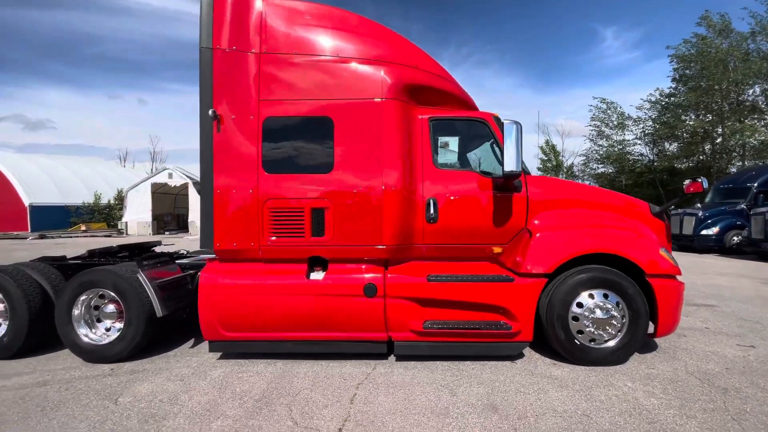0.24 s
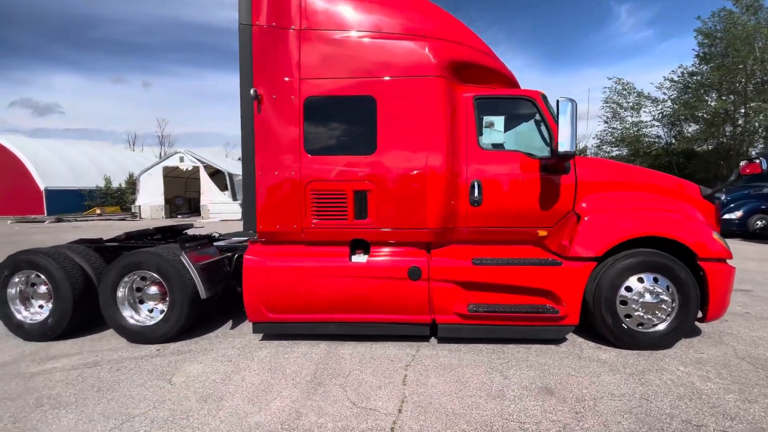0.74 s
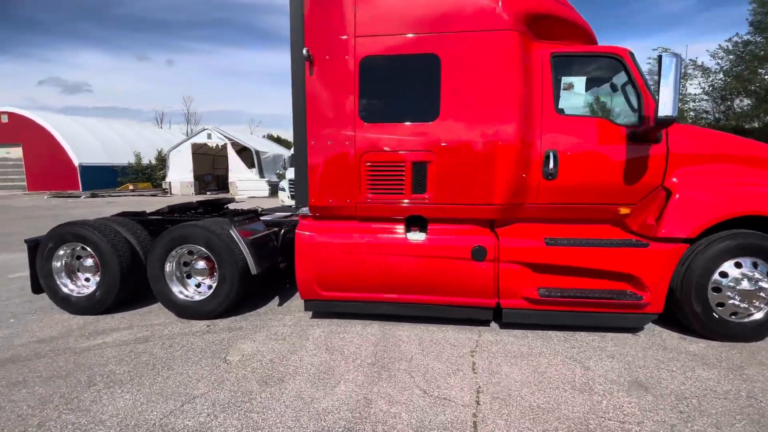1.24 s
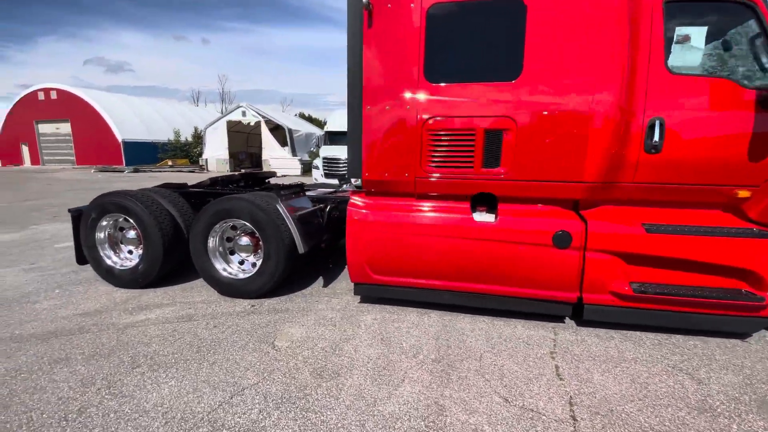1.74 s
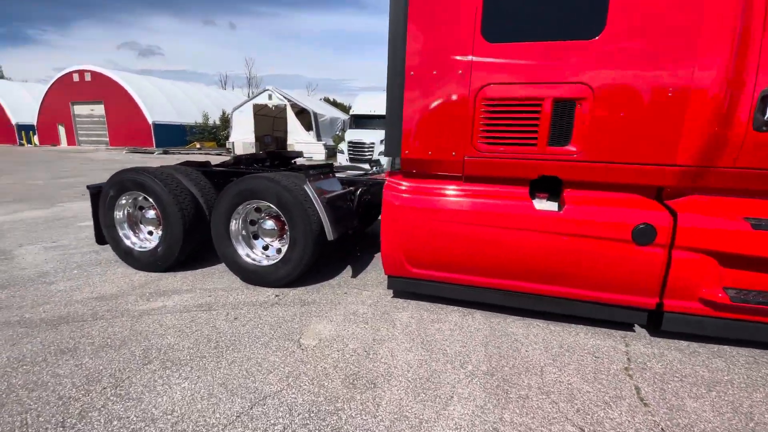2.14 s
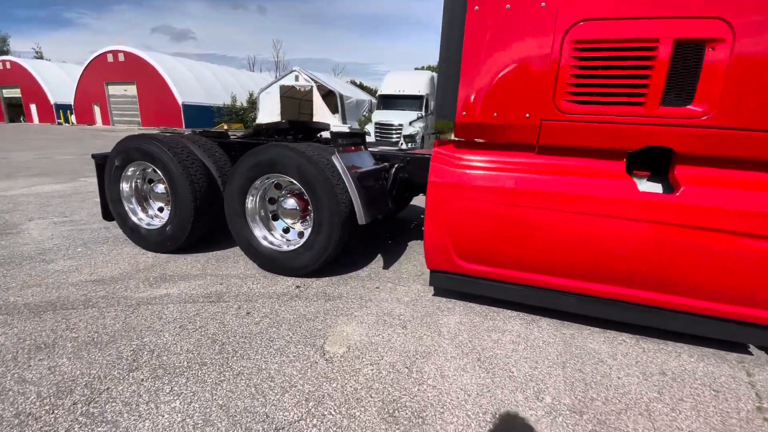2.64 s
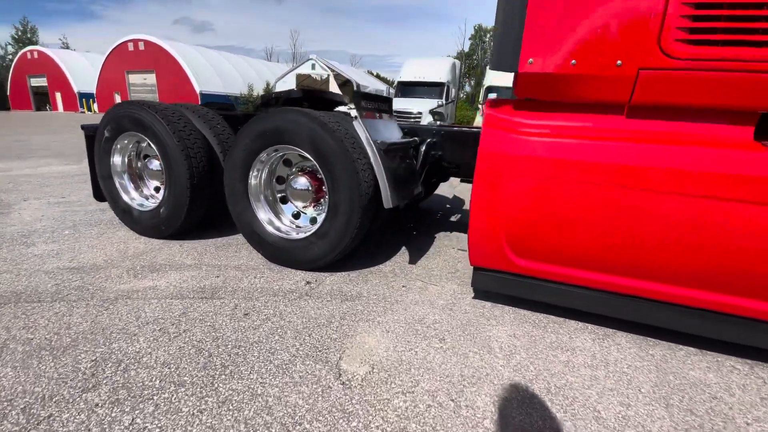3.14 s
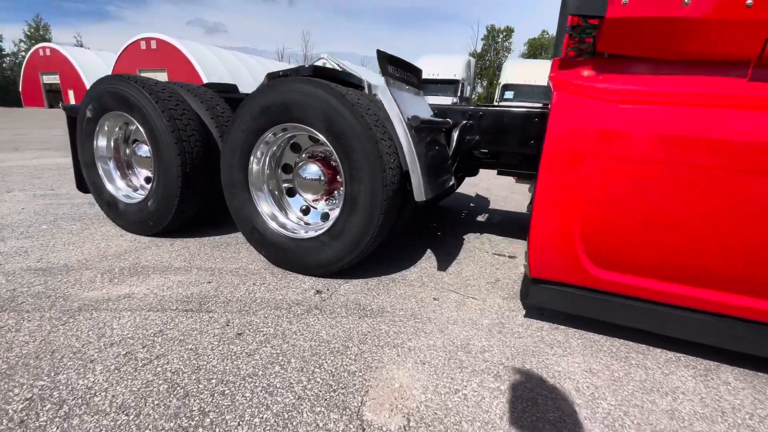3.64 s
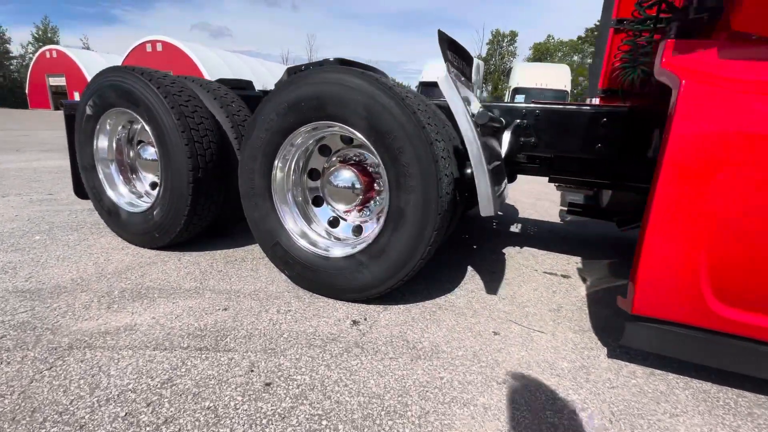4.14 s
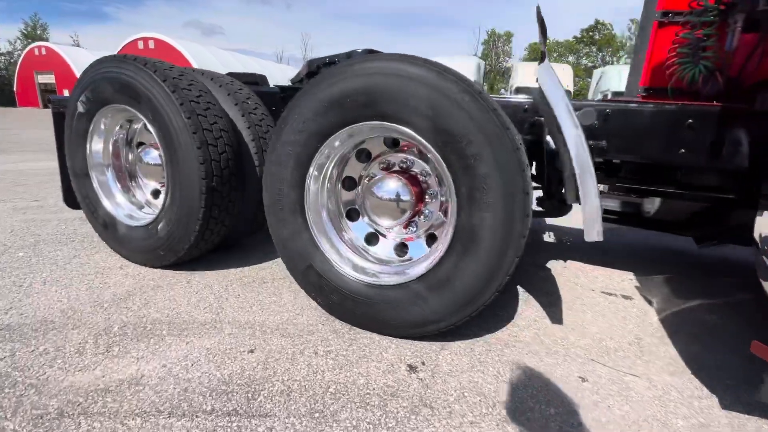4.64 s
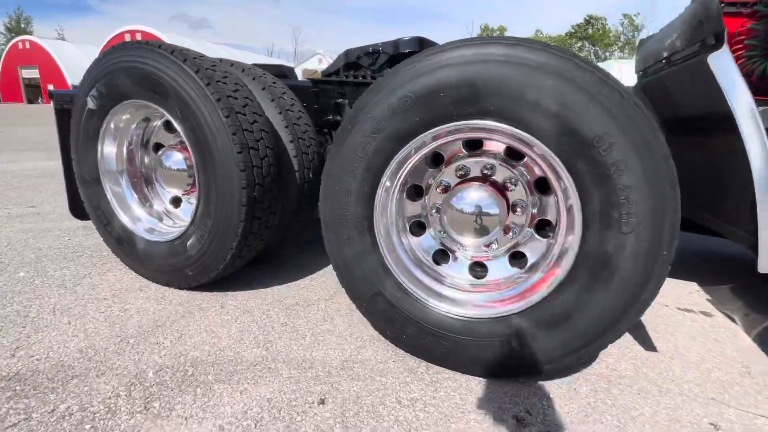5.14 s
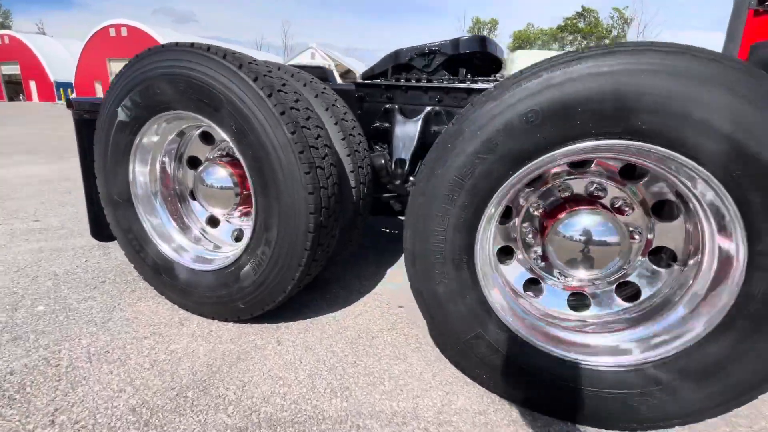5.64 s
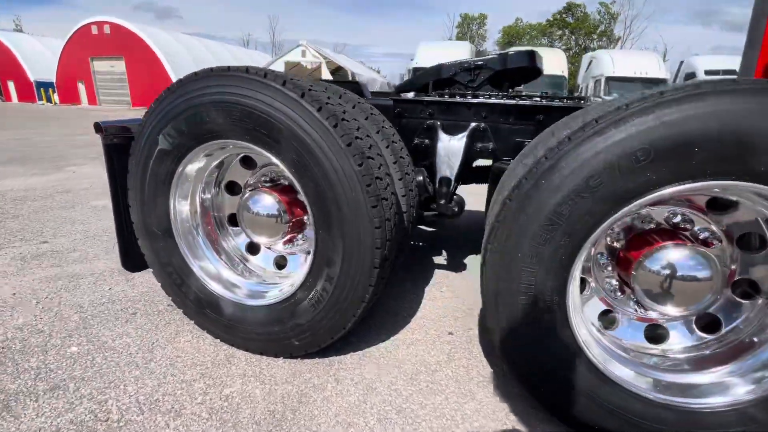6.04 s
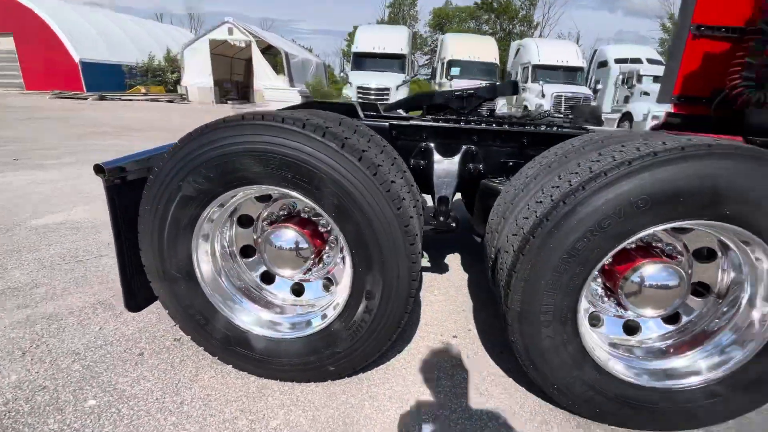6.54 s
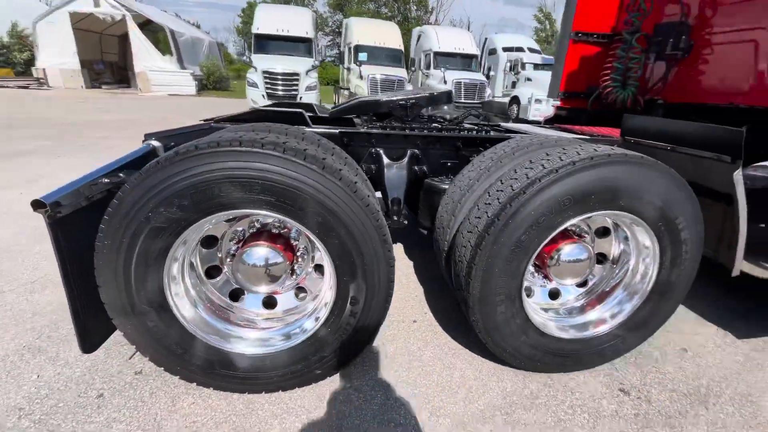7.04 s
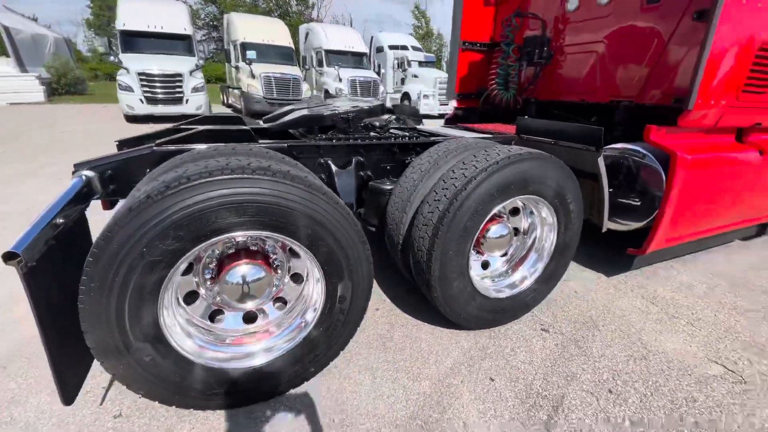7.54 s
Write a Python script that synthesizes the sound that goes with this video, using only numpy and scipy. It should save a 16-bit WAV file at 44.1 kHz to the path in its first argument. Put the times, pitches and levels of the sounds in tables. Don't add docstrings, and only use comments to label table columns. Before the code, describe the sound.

On an open paved lot a large diesel truck idles with low throbbing drone, dense clatter and airy fan hiss. Wind thumps and flutters on a hand-held stereo microphone, mostly on the left. The bass thins early and returns as the walk reaches the rear wheels, where shoes scrape grit. Late on, a sharp spit of compressed air bursts out, the sound briefly ducks, and the idle comes back more distant.

```python
import sys
import numpy as np
from scipy import signal
from scipy.fft import rfft, irfft, next_fast_len
from scipy.io import wavfile
from scipy.ndimage import map_coordinates

SR = 44100
rng = np.random.default_rng(int(sys.argv[2]) if len(sys.argv) > 2 else 0)


def nominal_scale(level):
    x = np.asarray(level, float) / 20
    return 10 ** x


def inscribe(sig):
    pcm = np.round(np.clip(np.atleast_2d(sig).T, -1, 1) * 32767)
    wavfile.write(sys.argv[1], SR, pcm.astype(np.int16))


N = 343523

# (time [s], place [share])
WALK = [
    (0, 0.037),
    (2.0, 0.29),
    (4.4, 1),
    (7.79, 1),
]
# (time [s], distance [m])
DISTANCE = [
    (0, 3.94),
    (1.6, 4.05),
    (3.2, 3.99),
    (5.3, 4.47),
    (6.0, 5.56),
    (7.17, 4.07),
    (7.35, 8.6),
    (7.79, 8.2),
]
# (middle [s], half length [s], gain [dB])
DRONE_GAPS = [
    (3.6, 0.32, 7),
    (5.6, 0.6, 9.6),
]
# (middle [s], half length [s], gain [dB])
CLATTER_GAP = (5.52, 1, 3.4)
# (time [s], change [dB], glide [s])
BASS_CUT = [
    (1.57, -14.5, 0.052),
    (3.9, 10, 0.39),
    (4.38, 3.5, 0.052),
    (7.62, -9, 0.017),
]
# (frequency [Hz], coherence [share])
LIKENESS = [(60, .88), (250, .9), (500, .82), (1000, .8), (2000, .5), (4000, .3), (7500, .65), (8800, .85),
            (9800, .9995), (10500, .9995), (12000, .97)]
# (frequency [Hz], left over right [dB])
LEFT_DB = [(60, -1), (400, -1), (1200, 2.5), (2200, 3.5), (4000, 5), (7000, 10.5), (9000, -1), (9700, 0),
           (13000, 0)]
# (frequency [Hz], left lead [rad])
LEAD = [(0, 0), (100, -.45), (520, -1.5), (1120, -1.7), (1640, -3.5), (3270, 2.4), (4310, -.3), (5430, 3.4),
        (6120, 5.9), (8350, 7.9), (9220, 4.6), (9750, np.pi), (10500, np.pi), (10900, 2.75), (11600, .7),
        (11900, 0), (13300, 0)]
# (frequency [Hz], density [dB])
GUST_SPECTRUM = [(15, -41), (35, -8.5), (70, 8.5), (180, 2), (350, -4), (700, -22.5), (1200, -20.5),
                 (2500, -80)]
# (peak [s], half length [s], left level [dB], left over right [dB])
GUSTS = [(1.181, .12, -12.5, 6.5), (1.424, 0.15, -17.5, 12), (1.675, .1, -14.5, 18), (2.021, .15, -18, 4),
         (2.596, .2, -20.5, 4.5), (2.895, .22, -15.5, 3), (3.399, .25, -16.5, 1), (4.709, 0.25, -25.5, 1),
         (5.197, .5, -23.5, 19), (6.001, .3, -21.5, 1), (6.548, 0.27, -17.5, -1.5), (7.314, .12, -17, 3)]
# (time [s], peak [dB], frequency at the peak [Hz])
PUFFS = [(1.15, -3, 800), (1.159, -2, 526), (1.175, -9, 480), (1.183, -2, 750), (1.187, -6, 400),
         (1.263, -9, 430), (1.284, -3.5, 397), (1.366, -3, 450), (1.367, -9, 1400), (1.468, -5, 467),
         (1.642, -5, 477), (1.658, -1, 760), (1.714, -8, 480), (2.014, 2, 1040), (2.022, -6, 700),
         (2.027, -8, 490), (2.674, -2, 775), (2.686, -11, 1100), (2.749, -6, 680), (2.81, -1, 760),
         (2.818, -7, 490), (2.879, -4, 330), (2.908, -12, 505), (2.922, -5.5, 805), (2.936, -3, 1120),
         (2.956, -2, 1130), (3.161, -9, 420), (3.354, -2.5, 845), (3.547, -2.5, 900), (3.555, -7, 606),
         (3.731, -1.5, 840), (4.447, -10, 800), (4.464, -1.5, 1290), (4.482, -7, 1400), (4.781, -2, 534),
         (5.053, -13, 680), (6.362, -7, 622), (6.454, -4, 513), (7.295, -8, 616), (7.305, -6, 490),
         (7.357, -6.5, 450), (7.358, -11, 1460), (7.529, -13, 890)]
# (time [s], peak [dB], frequency at the peak [Hz])
THUMPS = [(0.86, -6, 302), (0.969, -7, 332), (1.118, -5, 219), (1.165, -5, 260), (1.188, -5, 290),
          (1.267, -8, 252), (1.428, -1, 262), (1.46, -6, 220), (1.559, -2, 258), (1.63, -3, 332),
          (2.033, -8, 213), (2.418, -13, 355), (2.75, -10, 263), (3.803, -9.5, 410), (4.935, -8, 270),
          (6.025, -3, 288), (6.37, -6, 260), (6.459, -9, 270), (7.13, -16, 330), (7.19, -9, 260),
          (7.25, -14, 280), (7.298, -9, 298), (7.339, -11, 220)]
# (frequency [Hz], density [dB])
GRIT = [(400, -22), (800, -2), (1000, 0), (1600, 0), (2100, -6), (3000, -13), (4500, -36)]
# (time [s], rms level [dB], decay [s])
SCUFFS = [
    (2.935, -34, .012),
    (4.443, -28, .005),
    (4.461, -22, .004),
    (4.856, -21, .006),
    (5.092, -25, .03),
    (5.232, -22, .016),
    (5.34, -30, .02),
    (7.545, -31, .014),
]
# (middle [s], half
# length [s], frequency [Hz], bandwidth [Hz], rms level [dB])
RINGS = [(.2, .25, 1800, 150, -50), (.7, .55, 2700, 50, -47), (2.55, .2, 2720, 90, -52),
         (3.115, .045, 1180, 40, -34), (3.65, .1, 1600, 80, -47), (4.5, .04, 1700, 60, -37),
         (.25, .3, 4050, 200, -50), (7.15, .12, 4980, 80, -54), (6.778, .005, 6250, 250, -31),
         (6.8, .02, 6200, 80, -28), (6.83, .04, 7250, 400, -40), (.987, .004, 9500, 2500, -44),
         (7.555, .02, 2450, 200, -43), (7.7, .12, 2850, 250, -54), (5.35, .03, 2900, 150, -46),
         (4.95, .06, 1400, 80, -40), (5.4, .5, 1370, 120, -42), (5.55, .1, 600, 60, -34),
         (5.3, .95, 560, 350, -28), (2.9, 1.3, 700, 250, -36), (.7, .7, 400, 20, -50),
         (6.9, .09, 2700, 150, -46), (6.803, .02, 4250, 200, -29), (6.97, .17, 1300, 300, -43),
         (6.96, .13, 1900, 500, -50), (1.8, .12, 750, 200, -34), (7.12, .08, 280, 80, -36)]
# (time [s], frequency [Hz], peak level [dB])
TURBO = [
    (0, 6172, -60),
    (1.2, 6186, -57),
    (3.1, 6192, -57),
    (4.2, 6136, -54),
    (5.3, 6120, -57),
    (6.7, 6124, -53),
    (6.9, 6120, -62),
    (7.3, 6110, -58),
    (7.79, 6090, -55),
]
# (frequency [Hz], density [dB])
BLAST = [(1200, -32), (1900, -10), (2300, -3), (2650, 3.5), (3400, 0), (4300, 7), (5200, 4.5), (6300, 8),
         (8000, 3.5), (9000, 4.5), (10500, 11), (11200, 11), (12000, 2), (12600, -12), (13000, -36)]
# (frequency [Hz], density [dB])
CLATTER = [(150, -19), (260, -1.5), (400, 0.5), (530, -2.5), (700, -2), (1050, -5), (1450, -3.5),
           (1800, -11), (2300, -17), (3200, -35)]
# (frequency [Hz], density [dB])
HISS = [(1500, 7.5), (2100, -10), (2500, 0), (2680, 2.5), (2900, 1.5), (3400, 1), (4300, 1.5), (5200, 1.5),
        (5700, -4), (7000, -6), (8500, -7.5), (10300, -1), (11000, 1), (11600, -10.5), (12900, -24)]
# (middle [s], half length [s], frequency [Hz],
# half width [octaves], gain [dB])
BAND_SWELLS = [(0.32, 0.63, 5300, 0.36, -3.5), (0.93, 0.58, 670, 0.28, 3.5), (0.065, 0.12, 1600, 0.64, 3),
               (1.7, 1, 515, 0.11, -12), (1.4, 0.45, 1700, 0.39, -2.5), (3.3, 0.98, 342, 0.2, -12.5),
               (4.07, 0.21, 1500, 0.17, -3), (4.63, 0.29, 1530, 0.48, 3), (4.1, 0.8, 4100, 0.43, -2.5),
               (7.1, 0.2, 3500, 0.36, -6), (7.1, 0.22, 750, 0.2, -5), (7.68, .15, 550, 0.29, -7),
               (7.2, 0.11, 1200, 0.31, 3), (7.9, .3, 4600, 0.31, -2)]
# (multiple of the four-stroke cycle [1], rms level at the cab [dB], rms level at the axles [dB])
EXHAUST = [(12, -33, -35), (15, -32, -27), (18, -22.5, -19), (19, -32, -30), (20, -39, -35),
           (21, -18.5, -18), (24, -39, -41), (25, -35, -42), (26, -40, -49), (27, -34, -36), (28, -40, -41),
           (29, -44, -37), (30, -40, -39), (31, -39, -46), (32, -37, -52), (33, -33, -37), (34, -46, -58),
           (35, -33, -36), (36, -34, -46), (37, -39, -47), (38, -43, -54), (39, -35, -43), (41, -52, -51),
           (45, -46, -46), (56, -46, -38), (79, -38, -40)]
# (frequency [Hz], density [dB])
RUMBLE = [(20, -64), (50, 4.5), (90, -9), (190, 11.5), (260, -20.5), (400, -54)]

CYCLE_HZ = 5.0
VALVE_S = 6.783


def in_time(rows):
    s, *columns = np.transpose(rows)
    return [np.interp(np.arange(N) / SR, s, c) for c in columns]


def at_hz(points, hz):
    x, y = np.array(points).T
    return np.interp(np.log(hz + 1e-9), np.log(x), y)


def rms_one(x):
    return x / np.sqrt(np.mean(x ** 2) + 1e-20)


def ramp(s, length):
    return np.clip((np.arange(N) / SR - s) / length, 0, 1)


def hump(s, half):
    return np.exp(-((np.arange(N) / SR - s) / half) ** 2)


def drift(rate, count=1, size=N):
    r = np.exp(-80 * np.pi * rate / SR)
    white = rng.standard_normal((count, N // 40 + 2002))
    slow = signal.lfilter([1], [1, -2 * r, r * r], white)[:, 2000:]
    read_at = np.arange(size) * N / size / 40
    return np.array([np.interp(read_at, np.arange(len(s)), rms_one(s)) for s in slow])


def plain_noise(spectrum):
    size = next_fast_len(N)
    hz = np.arange(size // 2 + 1) * SR / size
    return rfft(rng.standard_normal((2, size))) * nominal_scale(at_hz(spectrum, hz)), hz, size


def noise(spectrum, patchy_db=None, rate=None):
    shaped, hz, size = plain_noise(spectrum)
    if patchy_db is None:
        return rms_one(irfft(shaped, size)[:, :N])
    lowest, highest = spectrum[0][0], spectrum[-1][0]
    edges = lowest * 2 ** np.arange(0, np.log2(highest / lowest) + .5, .5)
    small = min(size, next_fast_len(int(size * 2.5 * edges[-1] / SR)))
    shaped, hz = shaped[:, :small // 2 + 1], hz[:small // 2 + 1]
    flicker = nominal_scale(patchy_db * drift(rate, count=len(edges), size=small))
    patchy = 0
    for lo, hi, gain in zip(edges, edges[1:], flicker):
        patchy = patchy + gain * irfft(shaped * ((hz >= lo) & (hz < hi)), small)
    return rms_one(irfft(rfft(patchy), size)[:, :N])


def recorder_db():
    delay_s, attack_s, depth_db = 0.008, .025, -28.5
    start = VALVE_S + delay_s

    def duck(hold_s, release_s):
        return depth_db * (ramp(start, attack_s) - ramp(start + attack_s + hold_s, release_s))

    cut_db = sum(step_db * ramp(s, glide) for s, step_db, glide in BASS_CUT)
    return cut_db, duck(0.11, 0.27), duck(.16, .3)


def engine_levels(cut_db, duck_db, mid_db):
    near_m = 4.0
    metres, place = in_time(DISTANCE)[0], in_time(WALK)[0]
    loss_db = -20 * np.log10(metres / near_m)
    drone_gap_db = sum(db * hump(s, half) for s, half, db in DRONE_GAPS)
    middle, half, db = CLATTER_GAP
    clatter_gap_db = db * hump(middle, half)
    boom_db = -19 + 0.87 * loss_db + cut_db + duck_db
    drone_db = -14 + 0.8 * loss_db - 7 * place + drone_gap_db
    drone_db = drone_db + 0.58 * cut_db + 0.76 * mid_db
    clatter_db = -29.5 + loss_db + clatter_gap_db + 0.69 * mid_db
    fan_db = -39.0 + loss_db + 0.14 * duck_db
    return boom_db, drone_db, clatter_db, fan_db


def ports(pair):
    size = next_fast_len(N + 4096)
    hz = np.arange(size // 2 + 1) * SR / size
    direct, scattered = rfft(pair, size)
    alike = np.clip(at_hz(LIKENESS, hz), 0, 1)
    turn = np.exp(-1j * np.interp(hz, *np.transpose(LEAD)))
    right = alike * turn * direct + np.sqrt(1 - alike ** 2) * scattered
    tilt = nominal_scale(at_hz(LEFT_DB, hz) / 2)
    return irfft([direct * tilt, right / tilt], size)[:, :N]


def gusts():
    sides = np.array([[0], [-1]])
    power = sum(nominal_scale(left_db + pan_db * sides) ** 2 * hump(s, half) for s, half, left_db, pan_db in GUSTS)
    breeze = nominal_scale(-33.0 + 25.5 * sides)
    return np.sqrt(power + breeze ** 2)


def eddy(hz, fall, cycles):
    age = np.arange(int(9 * SR / hz)) * hz / SR
    shape = age / cycles * np.exp(1 - age / cycles)
    return shape * np.sin(2 * np.pi * 1.385 * np.log1p(fall * age) / fall)


def wind(strength):
    limit, opposed = 1.3, 0.26
    lumps_db = 4.96 * limit * np.tanh(drift(28.0, count=2) / limit)
    swarm = 0
    for hz in np.geomspace(90, 420, 5):
        born = (rng.random((2, N)) < 14.0 / SR) * rng.standard_normal((2, N))
        one = eddy(hz, fall=0.34, cycles=0.54)[None] * (90 / hz) ** 0.13
        swarm = swarm + signal.fftconvolve(born, one)[:, :N]
    air = noise(GUST_SPECTRUM, patchy_db=1.3, rate=14.5) + nominal_scale(-9.0) * rms_one(swarm)
    pressure = strength * nominal_scale(lumps_db - 1.0) * air
    return pressure - opposed * strength[1] / strength[0] * pressure[0] * [[0], [1]]


def stray_eddies(strength, count):
    when, size, pitch = rng.random((count, 3)).T
    share = np.cumsum(strength) / np.sum(strength)
    at = np.searchsorted(share, (np.arange(count) + when) / count).clip(900, N - 1)
    swing_db = 20 * np.log10(strength[at] / strength.mean())
    peak_db = -20.0 + 8.0 * (size - .5) + .4 * swing_db
    low_hz, high_hz = 440.0, 950.0
    return list(zip(at / SR, peak_db, low_hz * (high_hz / low_hz) ** pitch))


def puffs(eddies):
    out, t = np.zeros((2, N + SR)), np.arange(-600, 1800) / SR
    burst_shape = np.exp(-np.abs(t) / np.where(t < 0, .004, .011))
    draws, rough = rng.random((len(eddies), 4)), rng.standard_normal((len(eddies), 2, len(t)))
    for (s, peak_db, hz), draw, white in zip(eddies, draws, rough):
        lee_db = 13.5 + 8.0 * (draw[3] - .5)
        front = eddy(hz, fall=0.31 + 0.37 * draw[0], cycles=0.62 + 0.45 * draw[1]) * np.sign(draw[2] - .5)
        band = signal.butter(3, [0.89 * hz, 1.71 * hz], "band", fs=SR, output="sos")
        burst = 0.16 * burst_shape * rms_one(signal.sosfilt(band, white))
        at = round((s - 1.036 / hz) * SR)
        for side, gain, lead in ((0, nominal_scale(peak_db - 5), 0), (1, nominal_scale(peak_db - lee_db - 8), 14)):
            out[side, at - lead:at - lead + len(front)] += gain * front
            out[side, at - 550:at - 550 + len(t)] += gain * burst[side]
    return out[:, :N]


def scuffs():
    out, t = np.zeros((2, N)), np.arange(SR // 5) / SR
    mid, side = noise(GRIT)
    grit = mid + .35 * side * [[1], [-1]]
    for s, level_db, decay in SCUFFS:
        fade = np.minimum(t / .001, 1) * np.exp(-t / decay)
        at = int(s * SR)
        rasp = rms_one(fade * grit[:, at:at + len(t)])
        out[:, at:at + len(t)] += nominal_scale(level_db) * np.sqrt(np.mean(fade ** 2)) * rasp
    return out


def rings():
    t, white, out = np.arange(N) / SR, rng.standard_normal((2, N)), np.zeros((2, N))
    for s, half, hz, width, level_db in RINGS:
        r = np.exp(-np.pi * width / SR)
        pole = [1, -2 * r * np.cos(2 * np.pi * hz / SR), r * r]
        span = np.abs(t - s) < 2 * half + .02
        ring = signal.sosfilt([[1, 0, -1] + pole] * 2, white[:, span])
        swell = np.exp(-((t[span] - s) / half) ** 4)
        out[:, span] += nominal_scale(level_db) * swell * rms_one(ring)
    return out


def turbo():
    hz, level_db = in_time(TURBO)
    pitch_waver, level_waver = drift(11.3, count=2)
    phase = 2 * np.pi * np.cumsum(hz + 6 * pitch_waver) / SR
    return nominal_scale(level_db + 4.0 * level_waver) * np.sin(phase) * [[1], [0]]


def air_valve():
    peak_db, hold_s = -11.5, .012
    t = np.arange(N) / SR - VALVE_S
    after = np.maximum(t - hold_s, 0)
    falling_db = np.maximum(-400.0 * after, -3.5 - 150.0 * after)
    rising_db = 5000.0 * np.minimum(t, 0)
    level_db = peak_db + np.maximum(rising_db + np.minimum(falling_db, 0), -120)
    jet = nominal_scale(level_db - 1.5 + 1.3 * drift(250.0)[0]) * noise(BLAST)
    top = signal.sosfiltfilt(signal.butter(4, 8000, "high", fs=SR, output="sos"), jet)
    return jet - top * (1 - nominal_scale(np.maximum(-40.0 * after, -60)))


def block(clatter_db, hiss_db, turns):
    firing = 1 + 0.012 * np.cos(2 * np.pi * 6 * turns) + 0.0034 * np.cos(2 * np.pi * turns)
    clatter = nominal_scale(clatter_db + 3.5) * firing * noise(CLATTER, patchy_db=1.36, rate=21.6)
    return clatter + nominal_scale(hiss_db + 2.0) * noise(HISS, patchy_db=0.99, rate=23.0)


def surroundings(x):
    ripple_db, ripple_hz, ripple_s = 2.1, 40, .2
    hz, s, spectra = signal.stft(x, SR, nperseg=2048, noverlap=1536)
    cells = rng.standard_normal((int(hz[-1] / ripple_hz) + 2, int(s[-1] / ripple_s) + 2))
    grid = np.meshgrid(hz / ripple_hz, s / ripple_s, indexing="ij")
    gain_db = ripple_db * rms_one(map_coordinates(cells, grid, order=1))
    for middle, half, centre_hz, octaves, db in BAND_SWELLS:
        in_band = np.exp(-(np.log2((hz + 1) / centre_hz) / octaves) ** 2)
        gain_db += db * np.outer(in_band, np.exp(-((s - middle) / half) ** 2))
    return signal.istft(spectra * nominal_scale(gain_db - .4), SR, nperseg=2048, noverlap=1536)[1][:, :N]


def exhaust(boom_db, drone_db):
    step = 20
    place = in_time(WALK)[0][::step]
    turns = -.12 + np.cumsum(CYCLE_HZ * (1 + .0002 * drift(.7)[0])) / SR
    waver, start = drift(1.5, count=len(EXHAUST), size=len(place)), rng.random(len(EXHAUST))
    lines = 0
    for (order, cab_db, axle_db), w, p in zip(EXHAUST, waver, start):
        share_db = boom_db if order < 23 else drone_db
        level_db = share_db[::step] + cab_db + (axle_db - cab_db) * place + w
        if order % 3 == 0:
            phase = -1.25 * (order % 2)
        elif order < 30:
            phase = 1.9 - 2 * np.pi * order * .03
        else:
            phase = 2 * np.pi * p
        lines = lines + nominal_scale(level_db + 21.5) * np.cos(2 * np.pi * order * turns[::step] + phase)
    pulse = 1 + 0.36 * np.cos(2 * np.pi * 6 * (turns - 0.055))
    flow = nominal_scale(drone_db - 9.5) * pulse * noise(RUMBLE, patchy_db=2.0, rate=7.4)
    return signal.resample_poly(lines, step, 1)[:N] * [[1], [0]] + flow, turns


def scene():
    cut_db, duck_db, mid_db = recorder_db()
    boom_db, drone_db, clatter_db, hiss_db = engine_levels(cut_db, duck_db, mid_db)
    boom, turns = exhaust(boom_db, drone_db)
    truck = boom + turbo() + air_valve() + rings()
    noisy = surroundings(block(clatter_db, hiss_db, turns))
    strength = gusts() * nominal_scale(.8 * mid_db)
    eddies = PUFFS + THUMPS + stray_eddies(strength[0], count=30)
    turbulence = wind(strength * nominal_scale(0.2 * cut_db))
    mix = ports(truck + noisy) + scuffs() + turbulence + puffs(eddies)
    return ramp(0, .004) * mix


def roll_off(x):
    return signal.sosfilt(signal.butter(12, 13710, fs=SR, output="sos"), x)


def record(dry):
    ceiling = .97
    x = nominal_scale(.6) * dry / ceiling
    return roll_off(ceiling * x / (1 + x ** 4) ** .25)


dry = scene()
out = record(dry)
inscribe(out)
```